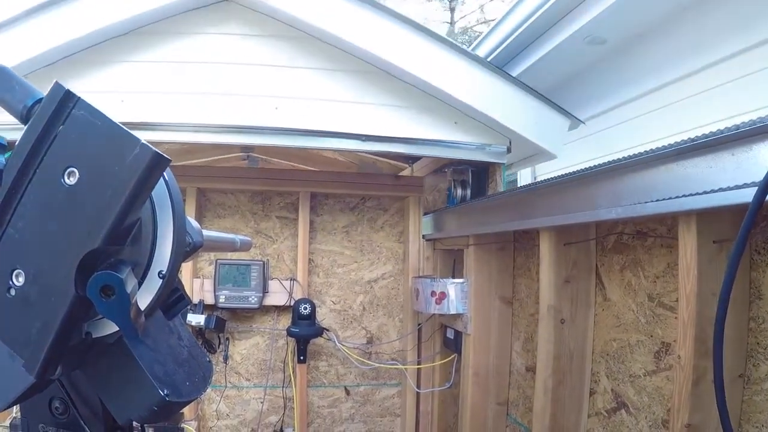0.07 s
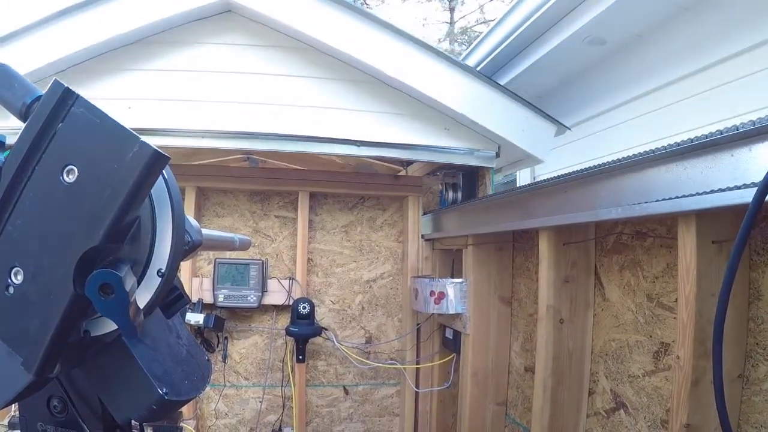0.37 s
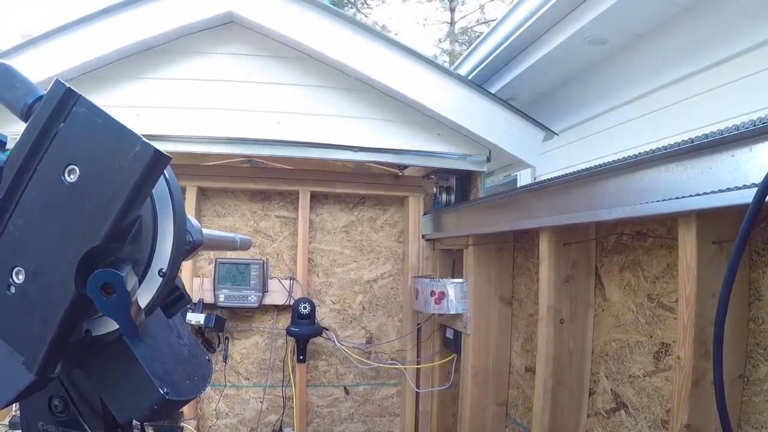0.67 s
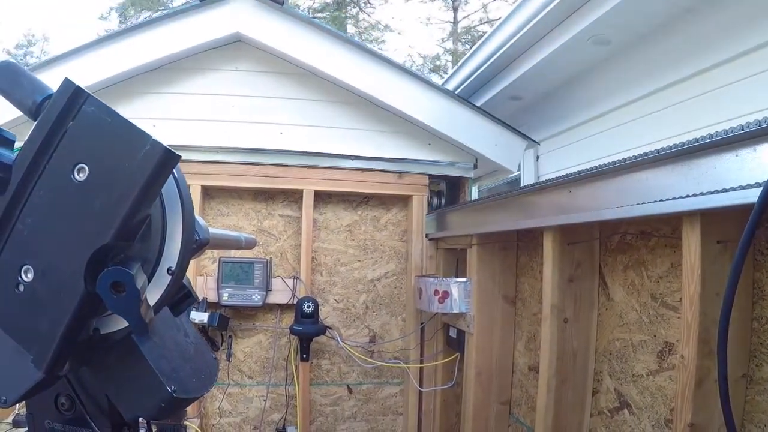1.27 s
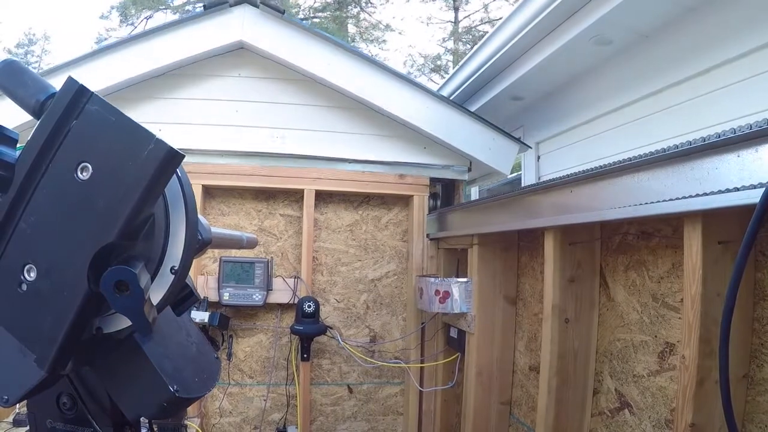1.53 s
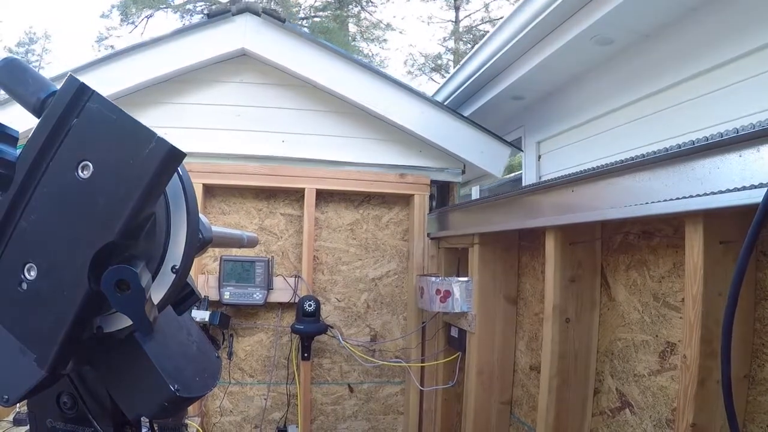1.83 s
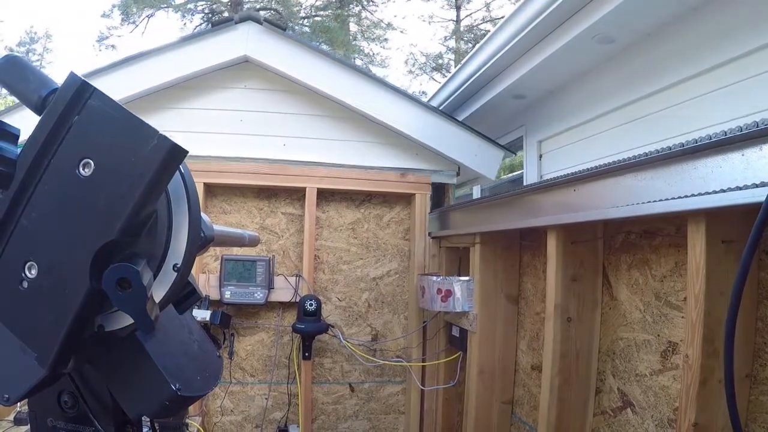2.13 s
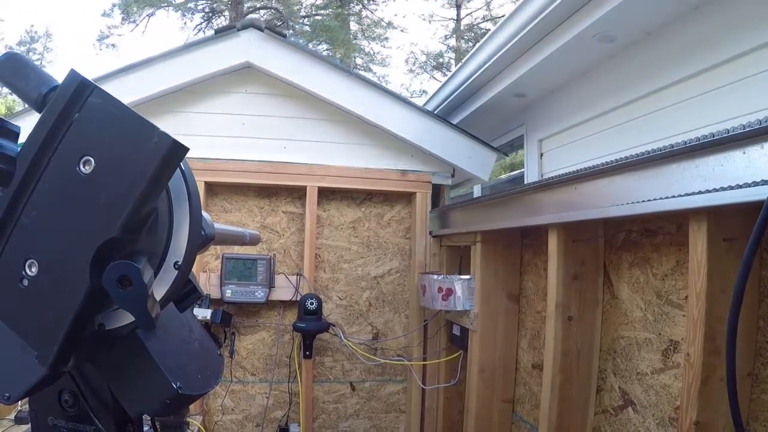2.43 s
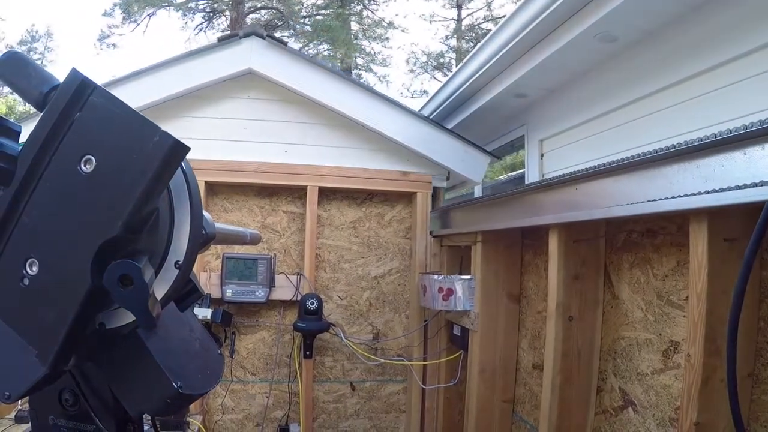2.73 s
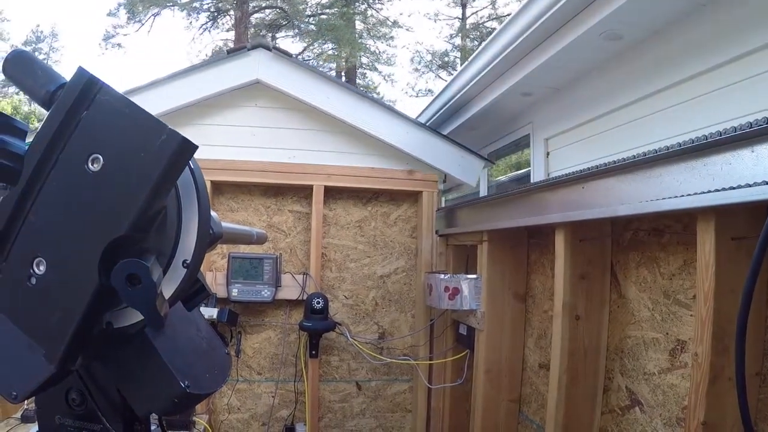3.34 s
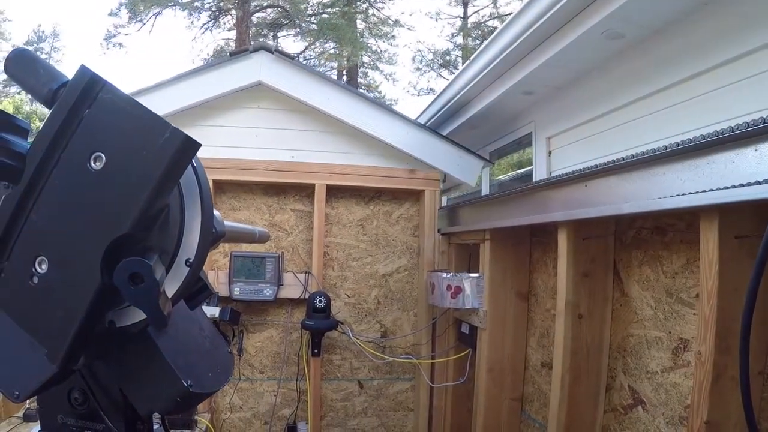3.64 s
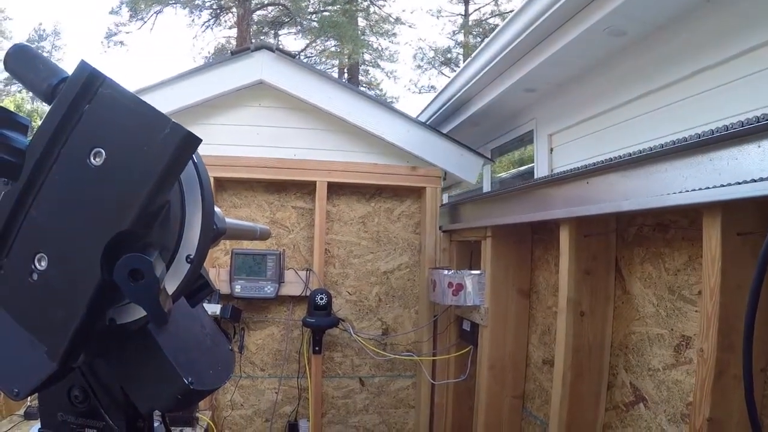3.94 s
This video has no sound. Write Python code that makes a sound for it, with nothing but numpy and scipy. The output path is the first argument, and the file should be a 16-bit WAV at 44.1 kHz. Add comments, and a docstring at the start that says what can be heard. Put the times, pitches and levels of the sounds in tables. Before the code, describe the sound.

Heavy roof rolling on a track with motor hum and clattering gears, ending with a click.

```python
"""A heavy roof rolls open on its track above a small wooden shed.
Its rollers grind, tick and squeal, and its weight makes the walls rumble.
The motor hums, its gears drone and whine, and the drive teeth clatter as they meet.
After three seconds the motor cuts out, the roof coasts to rest, and a relay (an electric switch) snaps."""
import sys
import numpy as np
from scipy import signal
from scipy.fft import rfft, irfft
from scipy.io import wavfile
from scipy.ndimage import uniform_filter1d

SR = 44100
rng = np.random.default_rng(int(sys.argv[2]) if len(sys.argv) > 2 else 0)


def to_wav(s):
    """Save 16-bit WAV."""
    ch = np.atleast_2d(s).T  # columns
    pcm = np.round(np.clip(ch, -1, 1) * 32767)  # PCM
    wavfile.write(sys.argv[1], SR, pcm.astype(np.int16))


N = 176400
T = np.arange(N) / SR

# Levels are relative. A COLOUR table says how strong the low and high parts of a sound are.
# still air: f/Hz, level/dB
AIR_COLOUR = [(30, 0), (120, -10.5), (300, -10), (550, -9.5), (900, -14), (2000, -40), (6000, -47),
              (15000, -48)]
# the shed's deepest shaking: t/s, level/dB
SWAY_LEVEL = [(0.0, -27), (0.05, -18), (0.42, -26), (0.6, -14.5), (0.82, -33), (1.06, -17.5), (1.1, -24),
              (1.41, -17.5), (1.48, -31), (1.82, -18.5), (2.09, -27), (2.25, -22), (2.55, -35), (2.65, -21),
              (2.78, -32), (3.1, -19.5), (3.28, -27), (3.48, -19.5), (3.82, -25), (4.0, -39)]
# its boom, about an octave higher: t/s, level/dB
BOOM_LEVEL = [(0.0, -32), (0.12, -22.5), (1.21, -31.5), (1.31, -20), (1.35, -32.5), (1.56, -18.5),
              (1.63, -30.5), (1.94, -19), (1.99, -35), (2.25, -17), (2.42, -37), (2.45, -25), (3.1, -30),
              (3.15, -19.5), (3.33, -34), (3.39, -27.5), (3.97, -53), (4.0, -49)]

# the relay's first crack: f/Hz, level/dB
CRACK_COLOUR = [(1500, -14), (2500, -2), (3300, -8), (5000, -1), (7200, 3), (8700, -9), (15000, -17)]
# its wash of sound in the room: f/Hz, level/dB
WASH_COLOUR = [(300, -8), (700, -6), (900, 0), (1200, -9), (1500, -6), (1900, 0), (2400, 0), (3100, -11),
               (3700, 0), (5200, 0), (7000, -9), (9000, -18), (15000, -30)]
# the treble of that wash: f/Hz, level/dB
SIZZLE_COLOUR = [(5500, -6), (6800, 0), (8500, -4), (10800, -2), (15000, -13)]
# the notes of its case: f/Hz, level/dB, time to fade by 60 dB/s
RELAY_NOTES = [(883, -26, 0.11), (943, -31, 0.13), (1690, -38, 0.11), (2280, -35, 0.1), (3914, -45, 0.12),
               (5152, -48, 0.1)]

# speed of the drive: t/s, speed/(teeth per second)
DRIVE_SPEED = [(0, 19.55), (.22, 19.68), (.72, 19.78), (.97, 19.87), (1.22, 19.68), (1.47, 19.52),
               (1.97, 19.54), (2.72, 19.3), (3.02, 19.1), (3.11, 17.4), (3.35, 13.35), (3.61, 7.7),
               (3.95, .3)]
# motor hum: multiple of the mains frequency, level/dB
HUM_NOTES = [(2, -23), (4, -40), (8, -55), (10, -55), (12, -45)]
# gear drone: multiple of its main pitch, level/dB
DRONE_NOTES = [(1, -28), (4 / 3, -41.5), (4, -47.5)]
# gear whine: multiple of the drone's main pitch, level/dB
WHINE_NOTES = [(6, -1), (9, -9.5)]
# rise and fall of the whine: t/s, level/dB
WHINE_LEVEL = [(0, 7.5), (.2, -3), (.33, 0.5), (.93, -0.5), (1.08, -1.5), (1.22, -4), (3.35, 2.5)]
# where the gear case rings: f/Hz, half width/Hz, level/dB
CASE_RESONANCES = [(320, 25, -44), (555, 14, -41), (725, 20, -41), (825, 6, -39), (965, 30, -43)]
# the clack of a tooth: f/Hz, level/dB
TOOTH_COLOUR = [(300, -35), (900, -1), (1300, 6), (1600, 2.5), (2300, 6), (2900, 2), (3400, 0), (3900, -6),
                (5500, -27), (9000, -25.5), (15000, -26)]
# teeth that catch hard: t/s, level/dB
CATCHES = [(.041, -33), (.143, -39), (.445, -41), (.547, -40), (.596, -38), (.650, -36), (.800, -40),
           (.848, -38), (1.048, -38), (1.149, -36), (1.201, -34), (1.302, -35.5), (1.404, -39),
           (1.455, -40), (1.506, -35.5), (1.763, -37.5), (1.864, -32), (2.069, -40), (2.170, -39),
           (2.219, -34), (2.374, -34), (2.581, -40), (2.892, -38), (3.102, -38)]
# the clack of a hard catch: f/Hz, level/dB
CATCH_COLOUR = [(700, -9), (1600, -5), (2300, 0), (2750, -2), (3400, -10), (3900, -4), (5500, -9),
                (12000, -25)]

# hollow bumps of the rollers: t/s, level/dB
BUMPS = [(.47, -26), (1.29, -32), (1.79, -31), (1.89, -29), (2.22, -26.5), (3.39, -37), (3.48, -37),
         (3.57, -33)]
# roller squeals: t/s, length/s, f/Hz, level/dB
SQUEALS = [(.26, .07, 860, -42), (2.19, .09, 865, -44), (2.915, .06, 866, -39)]
# roller ticks: t/s, level/dB, rise time/s, time to fade by 60 dB/s
TICKS = [(.043, -29, .001, .1), (.345, -33, .001, .14), (.657, -31, .001, .09), (.854, -29, .006, .12),
         (1.048, -40, .001, .1), (1.709, -34.5, .001, .14), (1.97, -31, .001, .11), (2.217, -37, .002, .15),
         (3.161, -38, .001, .06), (3.28, -31.5, .001, .09), (3.395, -31, .002, .14),
         (3.526, -39, .001, .09), (3.61, -40, .001, .08), (3.649, -41, .001, .12), (3.765, -45, .002, .15)]
# the sound of a tick: f/Hz, level/dB
TICK_COLOUR = [(300, 1), (900, 13), (1500, -1), (2400, 9), (3200, -5), (3800, 0), (5200, 3), (7000, -1.5),
               (8500, -7), (10500, -7), (15000, -17)]
# where the track rings: f/Hz, width/Hz, level/dB
TRACK_RESONANCES = [(545, 25, -56), (870, 40, -54), (960, 50, -54), (1245, 70, -50.5), (1830, 55, -54),
                    (2130, 80, -56), (2390, 160, -54), (3135, 70, -61)]
# the rollers' low rumble: f/Hz, level/dB
RUMBLE_COLOUR = [(15, -16), (24, 4.5), (55, -0.5), (100, 4), (150, -1), (200, -11), (265, -11.5),
                 (330, -20.5), (480, -35.5)]
# their grinding: f/Hz, level/dB
GRIND_COLOUR = [(200, -12), (320, 0.5), (450, 0.5), (680, -2), (900, 1.5), (1120, -3), (1340, -1.5),
                (1480, -6.5), (2000, -6.5), (2400, -8.5), (2950, -12.5), (3400, -25), (5000, -40)]
# their high hiss: f/Hz, level/dB
HISS_COLOUR = [(2000, -42), (3300, -12), (3600, 0.5), (4200, -3), (5000, -3), (6300, -10), (7200, -9),
               (8200, -16.5), (9050, -12.5), (9400, -19.5), (9850, -14), (10700, -16.5), (12500, -21),
               (15500, -25.5)]
# rolling while the motor pulls: t/s, rumble level/dB, grind level/dB, hiss level/dB
DRIVEN_LEVELS = [(0.0, -37.5, -34.5, -45), (0.43, -37, -35, -47), (1.05, -32.5, -34.5, -48),
                 (1.23, -33.5, -35, -46), (2.09, -34, -35.5, -48), (2.31, -35.5, -34.5, -45.5),
                 (2.93, -32, -35, -47.5), (3.0, -41, -34.5, -46)]
# coasting to rest: t/s, rumble level/dB, grind level/dB, hiss level/dB
COASTING_LEVELS = [(3.1, -38.5, -37, -50), (3.35, -38, -40, -48.5), (3.5, -43, -38.5, -52),
                   (3.6, -40.5, -46, -57), (3.72, -47.5, -48, -58.5), (3.87, -55.5, -54, -63.5),
                   (4, -49.5, -60, -67)]

DRONE_CYCLES_PER_TOOTH = 6.94


def from_db(db):
    """Turn decibels into a number to multiply by."""
    return 10 ** (np.asarray(db) / 20)


def unit_power(x):
    """Scale a sound so that its average power is one."""
    return x / np.sqrt(np.mean(x ** 2) + 1e-20)


def in_time(rows):
    """Join a table's points with straight lines: one curve for each column after the time."""
    times, *columns = np.transpose(rows)
    return [np.interp(T, times, column) for column in columns]


def coloured(colour, source=None):
    """Give noise, or another source, the lows and highs of a colour table."""
    hz, db = np.transpose(colour)
    f = np.maximum(np.arange(N // 2 + 1) * SR / N, 1)
    shape = from_db(np.interp(np.log(f), np.log(hz), db))
    edge_fade = np.minimum(f / hz[0], 1) ** 2 * np.minimum(hz[-1] / f, 1) ** 2
    source = rng.standard_normal(N) if source is None else source
    return unit_power(irfft(rfft(source) * edge_fade * shape, N))


def resonance(hz, half_width_hz):
    """Random shaking close to one pitch."""
    f = np.arange(N // 2 + 1) * SR / N
    return unit_power(irfft(rfft(rng.standard_normal(N)) / (1 + ((f - hz) / half_width_hz) ** 2), N))


def drift(rate_hz):
    """A random wobble, mostly slower than the given rate."""
    return resonance(0, rate_hz)


def tone(hz):
    """A pure note that follows a pitch."""
    return np.sqrt(2) * np.sin(2 * np.pi * np.cumsum(hz + np.zeros(N)) / SR)


def hit(start, db, rise_s, fade_s):
    """The loudness of one hit: it rises quickly and dies away by 60 dB in fade_s."""
    age = np.clip(T - start, 0, 2 * fade_s)
    return (1 - np.exp(-age / rise_s)) * from_db(db - 60 * age / fade_s)


def grit(grains_per_s=2500, grain_share=0.52):
    """Tiny grains being crushed, mixed with smooth rubbing."""
    grains = (rng.random(N) < grains_per_s / SR) * rng.choice([-1, 1], N)
    sizes = from_db(np.minimum(rng.exponential(1, N), 4))
    rubbing = rng.standard_normal(N)
    return np.sqrt(grain_share) * unit_power(grains * sizes) + np.sqrt(1 - grain_share) * rubbing


def air():
    """The faint, low hush of still air."""
    return from_db(-47) * coloured(AIR_COLOUR)


def shed_echoes(sound):
    """The wooden walls add many short echoes to a sound."""
    echoes = (rng.standard_normal(N) * hit(0.0013, 0, rise_s=0.00042, fade_s=0.074))[:N // 20]
    echoes /= np.sqrt(np.sum(echoes ** 2))
    return sound + from_db(-13.5) * signal.fftconvolve(sound, echoes)[:N]


def walls():
    """The rolling weight shakes the shed at two low pitches, which swell and sink."""
    out = 0
    for hz, half_width_hz, level in ((37.5, 5, SWAY_LEVEL), (77, 14.5, BOOM_LEVEL)):
        shake = resonance(hz, half_width_hz)
        # even out the random swells so that the table leads
        loudness = np.sqrt(uniform_filter1d(shake ** 2, size=2800) + 0.029)
        out += from_db(in_time(level)[0]) * shake / loudness
    return out


def relay(start=3.903):
    """The switch cracks and its case rings; the sound washes round the room, treble dying first."""
    crack = hit(start, -23.5, rise_s=.0001, fade_s=.011) * coloured(CRACK_COLOUR)
    wash = hit(start, -28, rise_s=.0055, fade_s=.13) * coloured(WASH_COLOUR)
    sizzle = hit(start, -37, rise_s=.0035, fade_s=.077) * coloured(SIZZLE_COLOUR)
    ring = sum(hit(start, db, .011, fade_s) * tone(hz) for hz, db, fade_s in RELAY_NOTES)
    return crack + wash + sizzle + ring


def motor(speed, mains_hz=60, off_s=3.045, fade_s=0.016):
    """Electric hum and a slightly higher gear drone throb under a thin whine until the power is cut."""
    hum = sum(from_db(db + 1.07 * drift(2.8)) * tone(k * mains_hz) for k, db in HUM_NOTES)
    drone_hz = DRONE_CYCLES_PER_TOOTH * speed
    drone = sum(from_db(db + 1.75 * drift(3)) * tone(k * drone_hz) for k, db in DRONE_NOTES)
    rotor_gain = from_db(-51 + 1.75 * drift(11))
    rotor_hz = 92.6 * speed + 14 * drift(40)  # the fast wobble makes the whine rough
    power_on = np.clip(1 - (T - off_s) / fade_s, 0, 1)
    return (hum + drone + rotor_gain * tone(rotor_hz)) * power_on


def gears(speed):
    """The whine falls as the gears slow, and swells at each pitch where their case rings."""
    whine = 0
    for k, level_db in WHINE_NOTES:
        pitch = k * DRONE_CYCLES_PER_TOOTH * speed
        case_gain = sum(from_db(db) / (1 + ((pitch - hz) / half_width) ** 2)
                        for hz, half_width, db in CASE_RESONANCES)
        whine += from_db(level_db + .8 * drift(5.8)) * case_gain * tone(pitch)
    return from_db(in_time(WHINE_LEVEL)[0]) * whine


def teeth(speed, effort, first_tooth_s=0.0367, release_db=-8):
    """Each tooth clacks as it grips and more softly as it lets go; some catch hard and ping."""
    teeth_passed = np.cumsum(speed) / SR
    teeth_passed -= np.interp(first_tooth_s, T, teeth_passed)
    times = np.interp(np.arange(0, teeth_passed[-1], .5), teeth_passed, T)  # two clacks a tooth
    clack_db = rng.normal(-36, 1.5, size=200)
    clack_power = sum(hit(start, clack_db[k] + release_db * (k % 2), rise_s=.003, fade_s=.075) ** 2
                      for k, start in enumerate(times))
    catches = sum(hit(start, db, rise_s=.0041, fade_s=.06) for start, db in CATCHES)
    ping = tone(3120 + 22 * drift(91))
    clacks = effort * np.sqrt(clack_power) * coloured(TOOTH_COLOUR, grit())
    return clacks + catches * (coloured(CATCH_COLOUR) + ping)


def bumps():
    """Uneven spots in the track thump the hollow roof and thud through the walls."""
    thump = resonance(hz=262, half_width_hz=42)
    thud = from_db(4) * resonance(hz=100, half_width_hz=28)
    return sum(hit(start, db, rise_s=.012, fade_s=.26) for start, db in BUMPS) * (thump + thud)


def squeals(wander_hz=1.4):
    """Now and then a roller sings for a moment on one wavering note."""
    out = 0
    for start, length, hz, db in SQUEALS:
        swell = np.sin(np.pi * np.clip((T - start) / length, 0, 1))
        out += from_db(db) * swell * tone(hz + wander_hz * drift(13))
    return out


def ticks():
    """The rollers make bright metal ticks on the track."""
    return sum(hit(*tick) for tick in TICKS) * coloured(TICK_COLOUR)


def rollers(rumble_db, grind_db, hiss_db, effort):
    """Under the heavy roof the rollers rumble, grind and hiss over grit, and make the track ring."""
    flutter = from_db(drift(21))
    rumble = from_db(rumble_db + 6) * coloured(RUMBLE_COLOUR)
    grind = from_db(grind_db - 2.5) * coloured(GRIND_COLOUR, grit())
    hiss = from_db(hiss_db + 0.5) * coloured(HISS_COLOUR, grit())
    track = effort * sum(from_db(db) * resonance(hz, width / 2) for hz, width, db in TRACK_RESONANCES)
    return rumble + flutter * (grind + hiss + track)


def scene():
    """The roof and its drive, heard from inside the shed."""
    speed, = in_time(DRIVE_SPEED)
    rumble_db, grind_db, hiss_db = in_time(list(DRIVEN_LEVELS) + list(COASTING_LEVELS))
    effort = from_db(grind_db - np.median(grind_db))  # track and teeth get louder with the grinding
    rolling = rollers(rumble_db, grind_db, hiss_db, effort)
    rattle = ticks() + teeth(speed, effort)
    drive = motor(speed) + gears(speed) + relay()
    return (walls() + bumps() + rolling + shed_echoes(rattle) + squeals() + drive + air())[None]


def record(dry, cutoff_hz=15400):
    """Cut away the very highest treble."""
    return signal.sosfilt(signal.ellip(12, .1, 80, cutoff_hz, fs=SR, output="sos"), dry)


dry = scene()
out = record(dry)
to_wav(out)
```